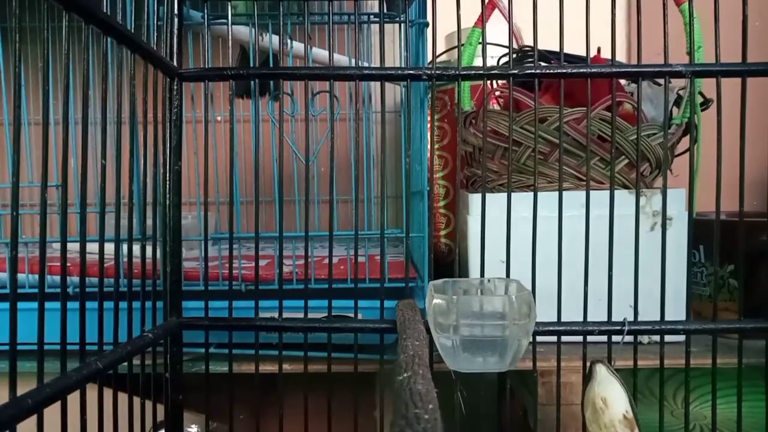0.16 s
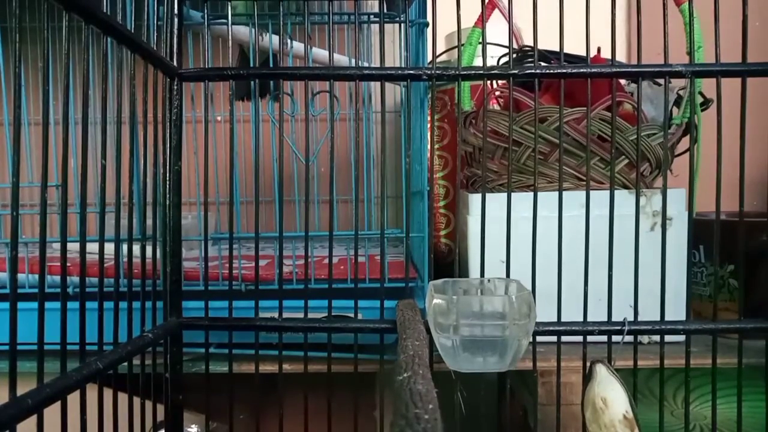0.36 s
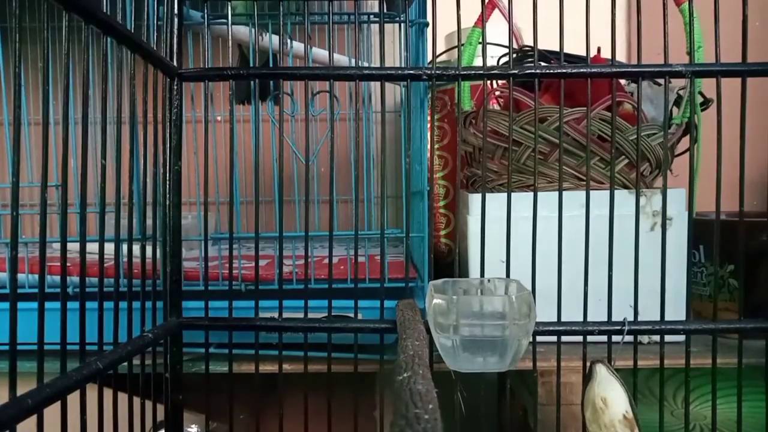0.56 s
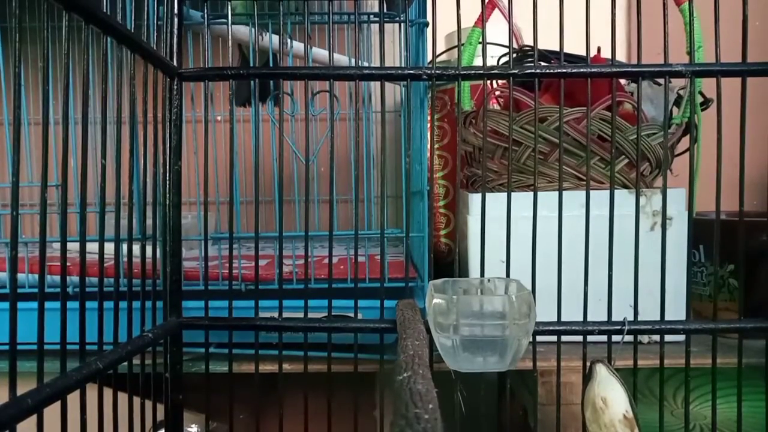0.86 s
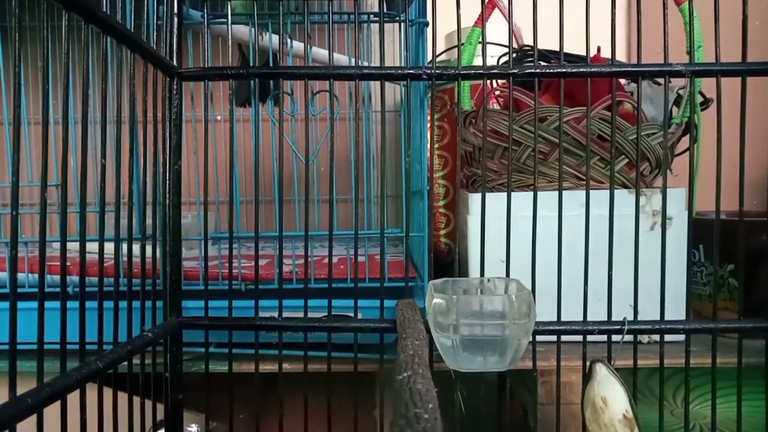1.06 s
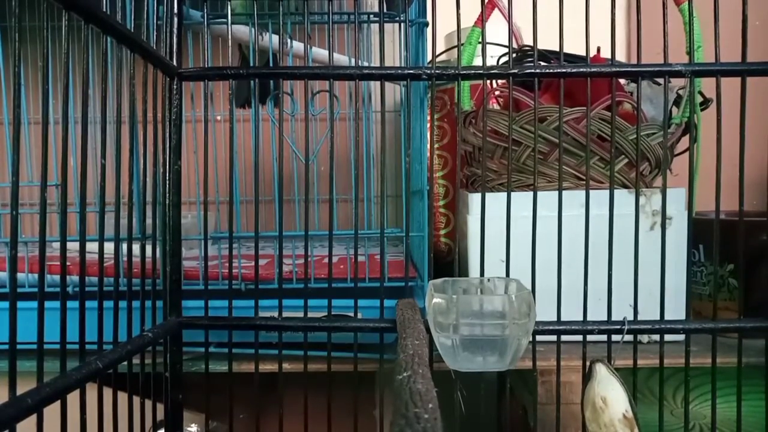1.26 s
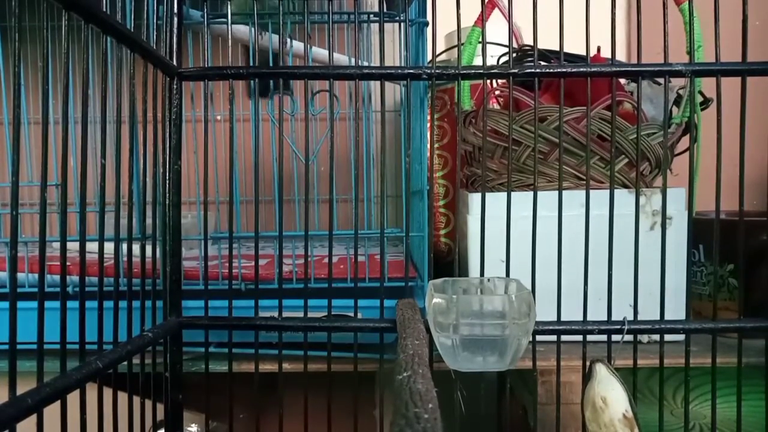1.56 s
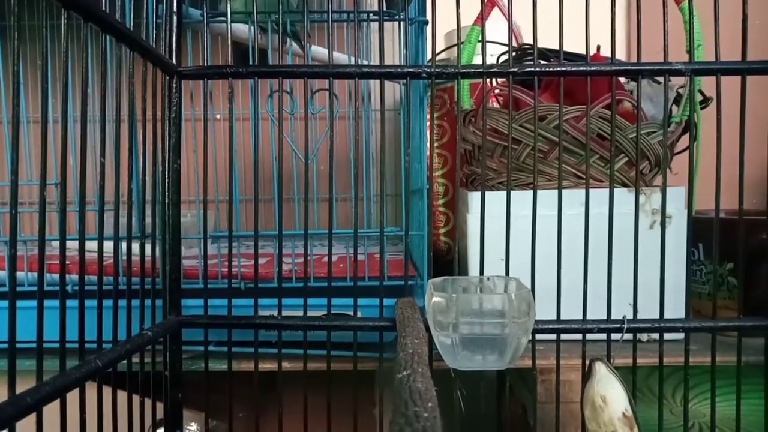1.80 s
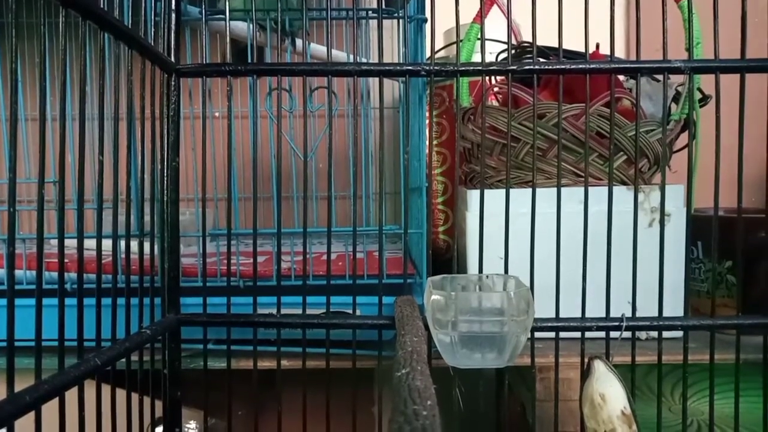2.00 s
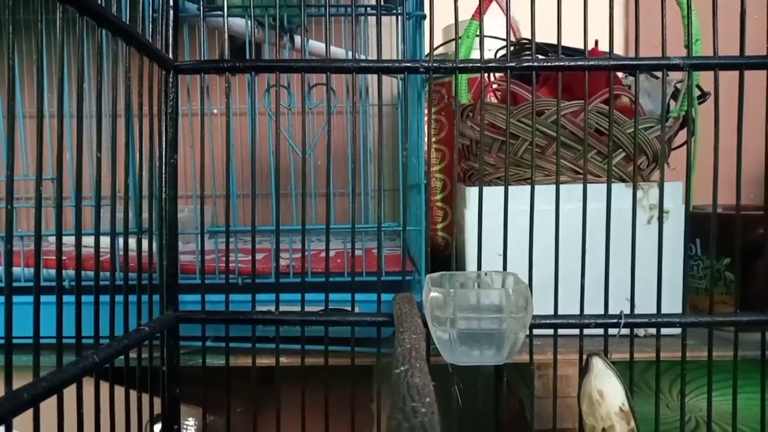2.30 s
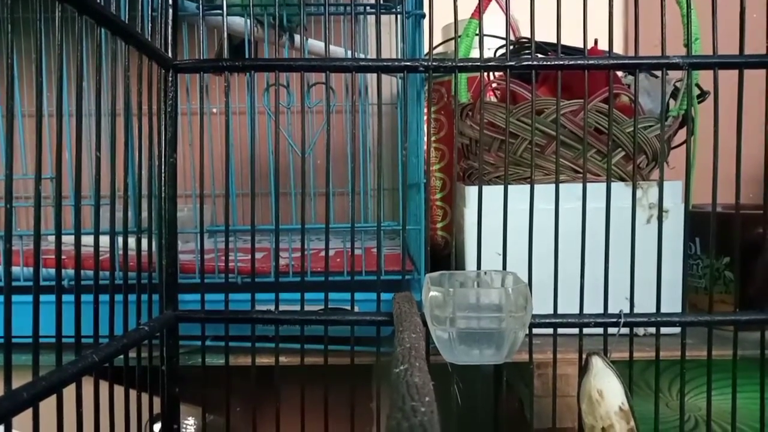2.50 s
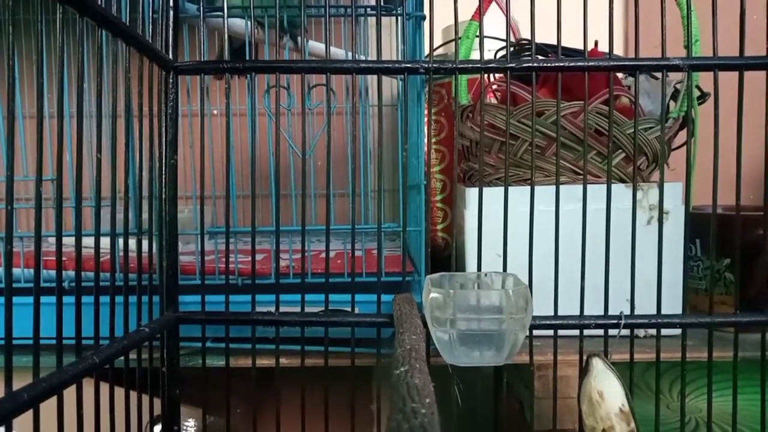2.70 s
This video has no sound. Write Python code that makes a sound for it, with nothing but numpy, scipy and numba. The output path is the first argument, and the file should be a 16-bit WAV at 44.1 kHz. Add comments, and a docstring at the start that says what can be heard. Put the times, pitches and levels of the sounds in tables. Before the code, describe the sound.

A caged songbird gives a sharp falling call, then five spaced high chirps, amid claw knocks

```python
"""A sliding bird call, perhaps from a farther bird, then five close chirps of two voices at once from a caged
songbird by a phone on a porch, all sung as sine partials on drawn pitch tracks. Claws tick on perch and wires
(ringing modes), wings rustle (swells of noise) and a far bird sounds nasal notes, heard only as echo. An insect
whine, a low hum, traffic rumble and air hiss lie behind. Hard walls ring on; the phone's gain control
ducks for the loud notes, and its input rounds off the highest peaks."""
import sys
import numpy as np
from scipy import signal
from scipy.io import wavfile
from scipy.ndimage import uniform_filter1d, minimum_filter1d
from numba import njit

SR = 44100
rng = np.random.default_rng(int(sys.argv[2]) if len(sys.argv) > 2 else 0)


def ratio_of_db(decibels):
    """Turn decibels (scalar or array-like) into linear amplitude factors; 0 dB maps to 1."""
    return 10 ** (np.asarray(decibels, float) / 20)


def digitize_waveform(pressure):
    """Quantize a signal to 16-bit integers and store it at the path in sys.argv[1].

    Rows of a 2-D input are taken as channels; values are limited to [-1, 1].
    """
    field = np.atleast_2d(pressure).T
    bounded = np.clip(field, -1, 1)
    quanta = np.round(bounded * 32767).astype(np.int16)
    wavfile.write(sys.argv[1], SR, quanta)


N = 125685
T = np.arange(N) / SR

# Ringing modes of the perch: mode_hz [Hz], relative_db [dB]
PERCH_MODES = [(680, -10.5), (830, 4), (1250, 4.5), (1580, 3), (1950, 8.5), (2300, 4.5), (2900, 4),
               (3800, -0.5), (5200, -5)]
# Ringing modes of the cage wires: mode_hz [Hz], relative_db [dB]
WIRE_MODES = [(7200, 18.5), (8400, 8), (15200, 14)]
PERCH_CYCLES, WIRE_CYCLES = 10, 60  # cycles to die 60 dB
PERCH_RATTLE_S, WIRE_RATTLE_S = .0035, .001  # decay time of the contacts
WIRE_BRIGHT_HZ = 9000  # strongest region of a wire tick
WOBBLE = 0.0058  # pitch unsteadiness of call and chirps, share of the pitch


def band(x, hz, width_hz):
    """Band-pass around hz."""
    low_hz = np.clip(np.sqrt(hz ** 2 + width_hz ** 2 / 4) - width_hz / 2, 10, 20000)
    limits = [low_hz, min(low_hz + width_hz, 21000)]
    return signal.sosfilt(signal.butter(2, limits, "band", fs=SR, output="sos"), x)


def unit(x):
    """Scale to rms 1."""
    return x / np.sqrt(np.mean(x ** 2))


def walk(rate):
    """Smooth random wander of rms 1, with rate fresh draws per second."""
    hold = int(SR / rate)
    steps = np.repeat(rng.standard_normal(N // hold + 1), hold)[:N]
    return unit(uniform_filter1d(uniform_filter1d(steps, hold), hold))


def track(rows, column):
    """A table column joined by straight lines in time."""
    rows = np.array(rows)
    return np.interp(T, rows[:, 0], rows[:, column])


def gate(rows):
    """1 while the table lasts, with soft ends."""
    return uniform_filter1d(1. * (T >= rows[0][0]) * (T <= rows[-1][0]), SR // 500)


def phase_of(hz):
    """Phase of a moving pitch, in radians."""
    return 2 * np.pi * np.cumsum(hz) / SR


def hump(start, length):
    """Half a sine over one event, silent outside it."""
    return np.sin(np.pi * np.clip((T - start) / length, 0, 1))


def air():
    """Traffic rumble and air hiss: third-octave noise bands swell together and flicker alone."""
    # Spectrum of the background: band_hz [Hz], relative_density_db [dB per Hz]
    air_curve = np.array([(25, -24), (100, 5), (170, -4.5), (400, -13), (1800, -18.5), (4500, -28),
                          (8200, -36.5), (9500, -51), (15500, -66)])
    out, swell = np.zeros(N), walk(5.3)
    for hz in 25 * 2 ** (np.arange(29) / 3):
        band_db = np.interp(np.log(hz), np.log(air_curve[:, 0]), air_curve[:, 1])
        band_db += 10 * np.log10(hz)  # a third-octave widens with its pitch
        moving_db = band_db + 1.2 * swell + 3 * walk(15)
        noise = band(band(rng.standard_normal(N), hz, hz / 3), hz, hz / 3)
        out += ratio_of_db(moving_db) * unit(noise)
    return unit(out) * ratio_of_db(-42)


def low_hum():
    """One sine slides up and fades in and out."""
    # Rising hum: time_s [s], pitch_hz [Hz], level_db [dB]
    hum_rows = [(.04, 240, -55), (.19, 390, -35), (.22, 410, -55)]
    return gate(hum_rows) * ratio_of_db(track(hum_rows, 2)) * np.sin(phase_of(track(hum_rows, 1)))


def insect():
    """A narrow flickering whine: slow noise modulates a carrier and its quadrature."""
    # Insect whine: time_s [s], pitch_hz [Hz], level_db [dB before the wander]
    whine_rows = [(0, 5250, -57.5), (.2, 5584, -39.5), (.35, 5480, -54), (1.7, 5380, -50.5)]
    width_hz = 280
    lowpass = signal.butter(4, width_hz / 2, fs=SR, output="sos")
    flutter = unit(signal.sosfilt(lowpass, rng.standard_normal((2, N))))
    phase = phase_of(track(whine_rows, 1))
    whine = flutter[0] * np.cos(phase) + flutter[1] * np.sin(phase)
    return ratio_of_db(track(whine_rows, 2) + 2 * walk(15)) * whine


def far_bird():
    """Short nasal notes with rough pitch: partials 2 to 4 sound without the fundamental."""
    # Far notes: start_s [s], length_s [s], fundamental_hz [Hz], level_db [dB added to each partial]
    far_rows = [(0.522, 0.073, 980, -15), (0.521, 0.052, 835, -17.5), (0.571, 0.062, 920, -17.5)]
    # Levels of partials 2, 3, 4 [dB]
    far_partials_db = [-11, -3.5, -8]
    out, wobble = np.zeros(N), 1 + .035 * walk(250)
    for start, length, hz, db in far_rows:
        phase = phase_of(hz * wobble)
        note = sum(ratio_of_db(d) * np.sin(k * phase) for k, d in enumerate(far_partials_db, start=2))
        out += ratio_of_db(db) * hump(start, length) * note
    return out


def soft_swells():
    """Grainy band noise in soft swells: wing rustles, and a low swell under the call."""
    # Noise swells, the first low and under the call, the others rustles:
    # start_s [s], length_s [s], level_db [dB], centre_hz [Hz]
    swell_rows = [(0.193, 0.16, -33, 255), (0.909, 0.071, -39.5, 2440), (1.06, 0.089, -43, 1810),
                  (1.283, 0.15, -41.5, 2600), (1.587, 0.16, -43, 2700), (2.015, 0.11, -37.5, 4230),
                  (2.664, .12, -43, 2710)]
    out = np.zeros(N)
    for start, length, db, hz in swell_rows:
        grain = rng.standard_normal(N) * ratio_of_db(2.4 * walk(90))
        grain = unit(band(band(grain, hz, hz), hz, 1.5 * hz))
        out += ratio_of_db(db) * hump(start, length) ** .5 * grain
    return out


def strikes(rows, modes, cycles, rattle_s):
    """Each row (start s, peak dB, brightest Hz) is a short rattle of contacts that rings the modes."""
    slope_db = 3  # fall per octave on either side of the brightest pitch
    out, t = np.zeros(N + SR), np.arange(SR // 10) / SR
    hz, db = np.array(modes).T[:, :, None]
    k = len(modes)
    for start, peak_db, bright_hz in rows:
        luck = rng.standard_normal((3, len(t)))
        gain = ratio_of_db(db - slope_db * abs(np.log2(hz / bright_hz)) + 5.0 * luck[0, :k, None])
        detuned_hz = hz * (1 + 0.073 * luck[0, k:2 * k, None])
        decay = 1000 ** (-t * hz / cycles)
        ring = (gain * np.sin(2 * np.pi * detuned_hz * t) * decay).sum(axis=0)
        ring = ring * np.clip(t * hz.max() / 2, 0, 1)  # soft onset
        contacts = luck[2] ** 3 * np.exp(-t / rattle_s)  # cubing leaves a few strong contacts
        hit = signal.fftconvolve(ring, contacts)[:len(t)]
        i = int(start * SR)
        out[i:i + len(t)] += ratio_of_db(peak_db) * hit / abs(hit).max()
    return out[:N]


def perch_knocks():
    """Claws and beak knock the perch, whose modes die within a few cycles."""
    # Perch knocks: start_s [s], peak_db [dB], brightest_hz [Hz]
    knock_rows = [(0.041, -29.5, 2200), (0.066, -24, 813), (0.086, -8, 2180), (0.182, -24, 2076),
                  (0.282, -5, 1770), (0.3, -4.5, 2245), (0.791, -29, 800), (0.826, -20.5, 860),
                  (1.112, -16.5, 1500), (1.249, -18, 1390), (1.305, -24.5, 1500), (1.335, -13.5, 1220),
                  (1.365, -9, 1370), (1.455, -20.5, 2030), (1.49, -20.5, 719), (1.589, -19, 1870),
                  (1.702, -27, 712), (1.727, -16, 3800), (2.798, -23, 1890), (2.837, -9.5, 1500)]
    return strikes(knock_rows, PERCH_MODES, PERCH_CYCLES, PERCH_RATTLE_S)


def wire_ticks():
    """Ticks on the cage wires, whose high modes ring for more cycles."""
    # Wire ticks: start_s [s], peak_db [dB]
    tick_rows = [(0.0854, -24.5), (1.5355, -36)]
    rows = [(*row, WIRE_BRIGHT_HZ) for row in tick_rows]
    return strikes(rows, WIRE_MODES, WIRE_CYCLES, WIRE_RATTLE_S)


def scrabble():
    """Claws scrabble for a grip: a quick run of small hits on perch and wires together."""
    start_s, length_s, count = 1.336, .062, 16
    perch_db, wire_db = -21, -37  # loudest perch peak; every wire peak
    late, softer, bright = rng.random((3, count))
    times = start_s + length_s * (np.arange(count) + late) / count
    on_perch = np.column_stack([times, perch_db - 6 * softer, 3000 * bright])
    on_wires = [(s, wire_db, WIRE_BRIGHT_HZ) for s in times]
    perch = strikes(on_perch, PERCH_MODES, PERCH_CYCLES, PERCH_RATTLE_S)
    # wire hits here die within as few cycles as perch hits
    return perch + strikes(on_wires, WIRE_MODES, PERCH_CYCLES, WIRE_RATTLE_S)


def call():
    """Partials of a pitch arch, a whistle from the other side of the syrinx, their sum tone and breath."""
    # Sliding call: time_s [s], pitch_hz [Hz], first_db, second_db, fourth_db [dB of partials 1, 2, 4]
    call_rows = [(.201, 1875, -16, -73, -35), (.207, 1976, 1, -45.5, -24), (.2115, 2325, 7, -26, -46),
                 (.215, 2783, -3.5, -21, -44), (.224, 2968, -13.5, -1.5, -33),
                 (.236, 2558, -21.5, -22.5, -30), (.241, 2448, 10.5, -27, -59),
                 (.246, 2353, 1.5, -1.5, -19), (.259, 2080, 9.5, -4, -26), (.262, 2018, -14, 3, -16),
                 (.271, 1944, -28.5, -21, -12), (.279, 1851, -6.5, 7, -5), (.285, 1660, -20, -16.5, -11),
                 (.289, 1618, -59.5, 2.5, -17), (.316, 1539, -62, 2.5, -17), (.318, 1500, -54.5, -9.5, -18),
                 (.336, 1330, -76, -2.5, -39)]
    # Whistle from the other side: time_s [s], pitch_hz [Hz], level_db [dB]
    whistle_rows = [(.211, 5290, -71), (.218, 5222, -3.5), (.234, 5513, -7), (.240, 5253, 11.5),
                    (.244, 5240, -16)]
    third_db, upper_fall_db = -18.5, -13  # third partial re first; step per partial above the fourth
    sum_tone_db, breath_db = -19, -15.5  # both sides mix in the windpipe; breath noise
    pitch = track(call_rows, 1)
    phase = phase_of(pitch * (1 + WOBBLE * walk(300)))
    first, second, fourth = (ratio_of_db(track(call_rows, c)) for c in (2, 3, 4))
    upper = np.zeros(N)
    for k in range(5):
        below_limit = pitch * (4 + k) < SR / 2
        upper += ratio_of_db(upper_fall_db * k) * np.sin((4 + k) * phase) * below_limit
    voice = first * (np.sin(phase) + ratio_of_db(third_db) * np.sin(3 * phase))
    voice = gate(call_rows) * (voice + second * np.sin(2 * phase) + fourth * upper)

    other = phase_of(track(whistle_rows, 1))
    whistle = ratio_of_db(track(whistle_rows, 2)) * np.sin(other)
    sum_tone = ratio_of_db(sum_tone_db) * np.sin(phase + other)
    other_side = gate(whistle_rows) * (whistle + sum_tone)

    airflow = uniform_filter1d(gate(call_rows) * (pitch / pitch.max()) ** 3.0, int(.01 * SR))
    breath = airflow * unit(band(rng.standard_normal(N), 3500, 11000))
    roughness = 1 + .1 * walk(1200)
    return (voice + other_side) * roughness + ratio_of_db(breath_db) * breath


def chirps():
    """Both sides of the syrinx sing at once and beat; the upper voice climbs."""
    # Chirps: start_s [s], length_s [s], low_hz [Hz], low_db, high_db [dB added to the shape]
    chirp_rows = [(1.746, 0.035, 3210, 7, 8.5), (1.93, 0.029, 3254, 11, 8), (2.131, 0.028, 3282, 4, 11.5),
                  (2.292, 0.027, 3228, 7.5, 9), (2.527, .028, 3229, 6.5, 8)]
    # Shape of a chirp: share of its length, low_ratio [of low_hz], low_db [dB], high_ratio [of low_hz],
    # high_db [dB]
    chirp_shape = [(0, 0.92, -31, 1.05, -32), (0.198, 1, -3.5, 1.085, -4), (0.499, 1.0, 3, 1.1, 0),
                   (.75, 0.99, 3, 1.16, -0.5), (0.899, .99, -6.5, 1.14, -23), (1.001, 0.87, -30, 1.2, -36)]
    # Overtone levels [dB]: octave, sum of both voices, twelfth
    octave, sum_tone, twelfth = ratio_of_db([-26, -27.5, -37])

    def sung(phase):
        """One voice with its octave and twelfth."""
        return np.sin(phase) + octave * np.sin(2 * phase) + twelfth * np.sin(3 * phase)

    out, wobble = np.zeros(N), 1 + WOBBLE * walk(250)
    for start, length, hz, low_db, high_db in chirp_rows:
        rows = [(start + share * length, low_ratio, ratio_of_db(low), high_ratio, ratio_of_db(high))
                for share, low_ratio, low, high_ratio, high in chirp_shape]
        low_phase, high_phase = (phase_of(hz * track(rows, c) * wobble) for c in (1, 3))
        low_gain = ratio_of_db(low_db) * track(rows, 2)
        high_gain = ratio_of_db(high_db) * track(rows, 4)
        both = sum_tone * np.sqrt(low_gain * high_gain) * np.sin(low_phase + high_phase)
        out += gate(rows) * (low_gain * sung(low_phase) + high_gain * sung(high_phase) + both)
    return out


def room(x):
    """Echo of near walls and a diffuse tail of noise bands, each with its own decay."""
    # Diffuse tail: band_hz [Hz], level_db [dB], t60_s [s]
    tail_bands = [(1500, -23.5, 0.18), (3340, -25, 0.43), (5900, -24, 0.2), (11400, -24.5, 0.48)]
    # Near walls: lag_s [s], level_db [dB]
    wall_echoes = [(0.009, -15)]
    t = T[:SR]
    tail = np.zeros(SR)
    for hz, db, t60 in tail_bands:
        noise = unit(band(rng.standard_normal(SR), hz, 0.8 * hz))
        noise = noise * 1000 ** (-t / t60) * np.clip(t / 0.00667, 0, 1)  # builds up, then dies
        tail += ratio_of_db(db) * noise / np.sqrt(np.sum(noise ** 2))
    for lag, db in wall_echoes:
        tail[int(lag * SR)] += ratio_of_db(db)
    return signal.fftconvolve(x, tail)[:N]


def scene():
    """Near sounds with their room, the far bird as echo, and the background."""
    cage = perch_knocks() + wire_ticks() + scrabble() + soft_swells()
    slide, notes = call(), chirps()
    flicker = 1.3 * walk(500)  # fast random flicker on what feeds the room roughens and diffuses the echo
    slide_to_room = ratio_of_db(3.5) * slide * unit(1 + flicker)  # the call sounds farther off, with more echo
    notes_to_room = notes * unit(1 + flicker / 2)
    echo = room(cage + slide_to_room + notes_to_room + far_bird())
    return (slide + notes + cage + echo + insect() + low_hum() + air())[None]


@njit
def recover(db, release):
    """Gain drops at once and creeps back."""
    out, g = np.empty(len(db)), 0.
    for i in range(len(db)):
        g = min(db[i], g * release)
        out[i] = g
    return out


def roll_off(x):
    """The treble ends steeply here."""
    return signal.sosfilt(signal.butter(12, 15730, fs=SR, output="sos"), x)


def record(dry):
    """The phone: look-ahead gain control, rounded clipping and treble cut."""
    top_db, ratio = -10.5, 2.44  # threshold; compression above it
    ahead_s, release_s, clip = .011, .11, 1.05
    ahead = int(ahead_s * SR)
    loud_db = 10 * np.log10(uniform_filter1d(dry[0] ** 2, int(0.014 * SR)) + 1e-12)
    wanted_db = np.minimum(0, (top_db - loud_db) * (1 - 1 / ratio))
    wanted_db = minimum_filter1d(wanted_db, 2 * ahead + 1)
    gain_db = uniform_filter1d(recover(wanted_db, np.exp(-1 / (release_s * SR))), ahead)
    x = dry * ratio_of_db(gain_db)
    x = x / (1 + (x / clip) ** 10) ** (1 / 10)
    treble_cut = signal.ellip(8, .2, 60, 15700, fs=SR, output="sos")
    return roll_off(signal.sosfilt(treble_cut, x))


dry = scene()
out = record(dry)
digitize_waveform(out)
```